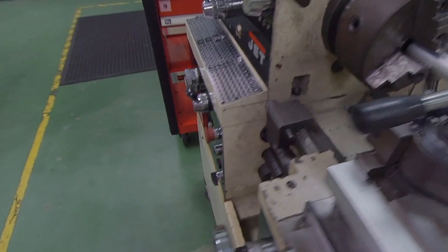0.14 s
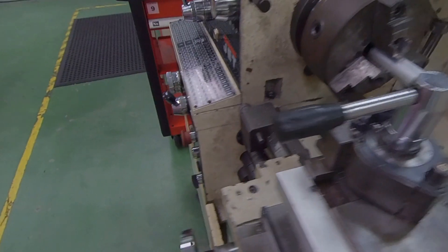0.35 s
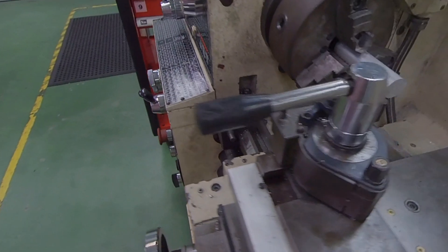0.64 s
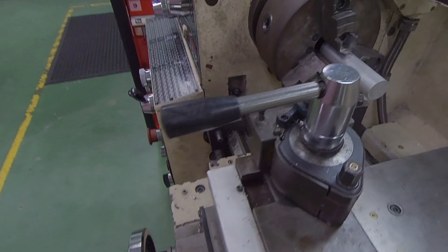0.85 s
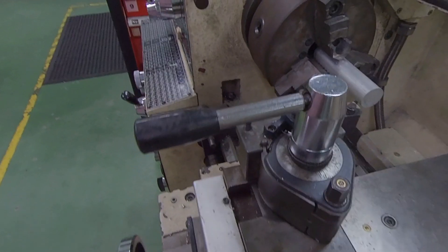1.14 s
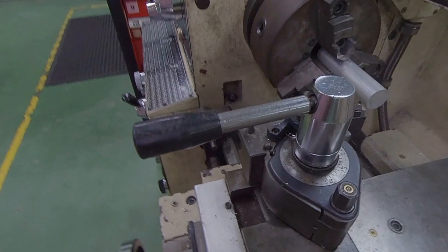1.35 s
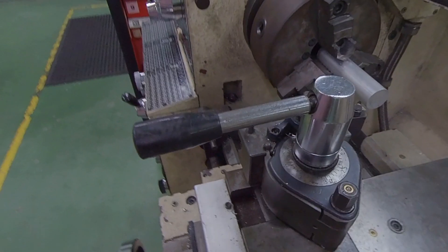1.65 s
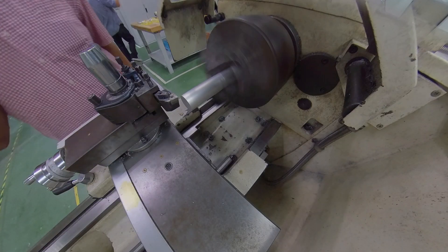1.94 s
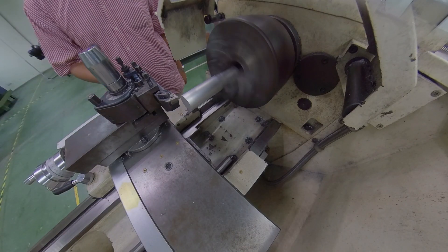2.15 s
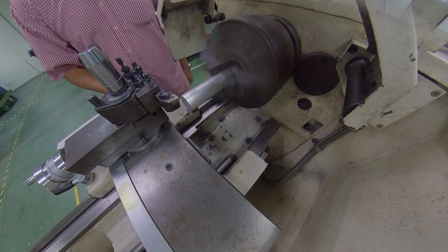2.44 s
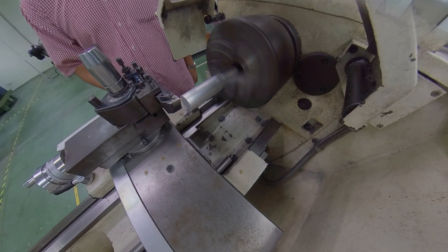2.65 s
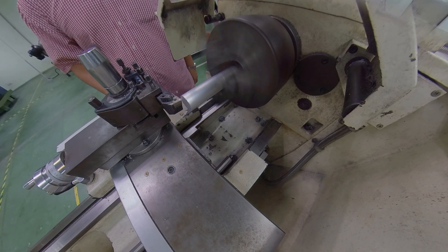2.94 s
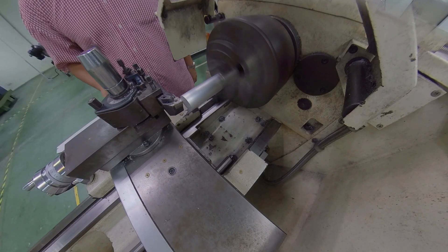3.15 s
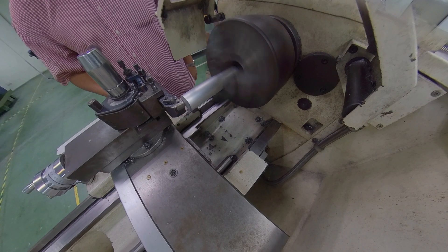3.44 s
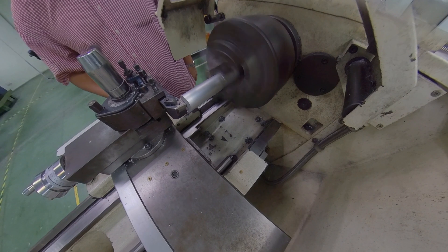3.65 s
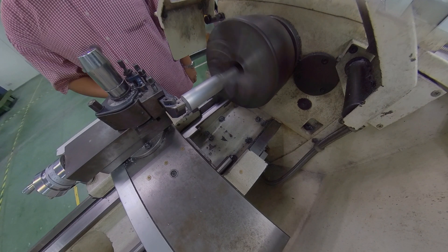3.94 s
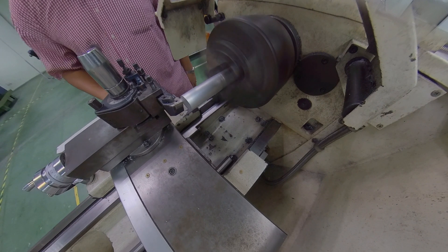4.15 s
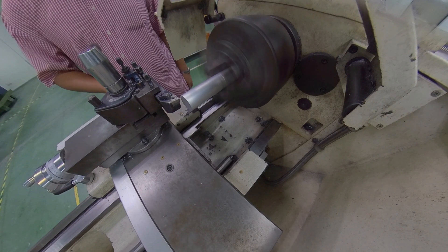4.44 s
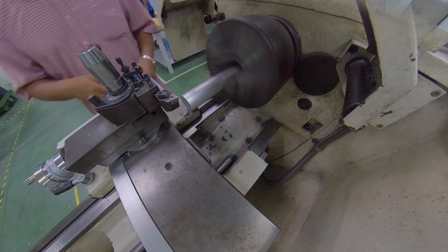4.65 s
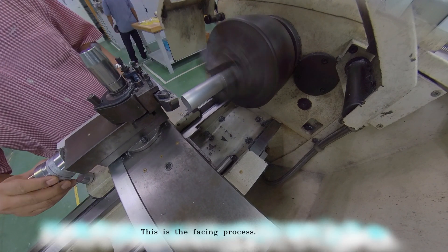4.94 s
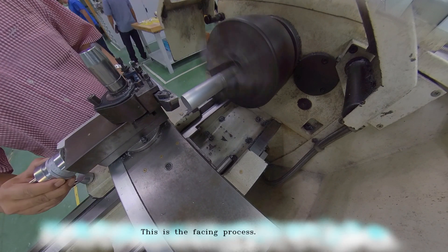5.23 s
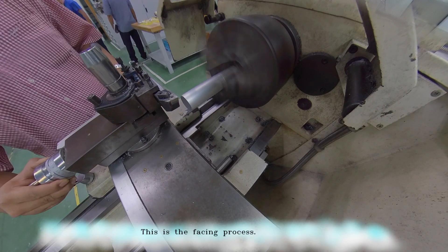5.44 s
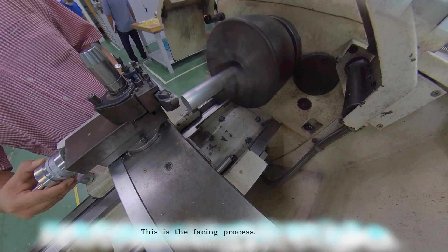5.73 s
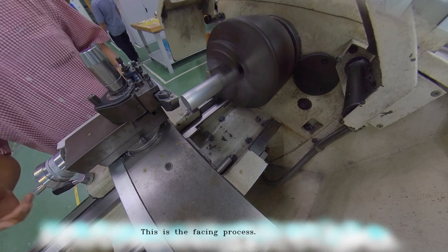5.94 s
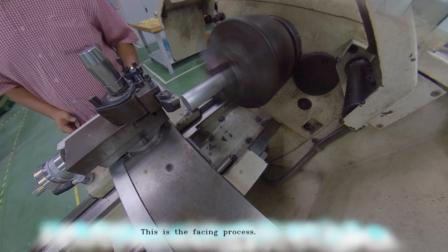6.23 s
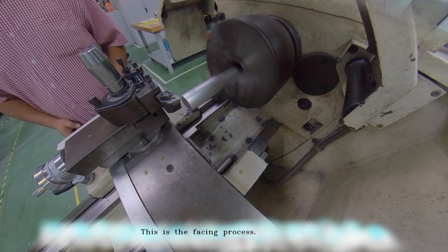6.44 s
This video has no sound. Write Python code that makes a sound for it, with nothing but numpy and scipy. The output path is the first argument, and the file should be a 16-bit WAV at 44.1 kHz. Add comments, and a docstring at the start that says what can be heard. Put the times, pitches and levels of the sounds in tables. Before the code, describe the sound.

From 0 to about 1.2 s a quiet workshop is heard: low rumble, soft distant hiss and faint airy whistles, the whistling lifting slightly near 0.95 s. A soft bump comes at 1.07 s and the background fades away. A small plastic button clicks at 1.52 s, then twice more, fainter, at 1.71 and 1.75 s. At 1.78 s a hard metallic rattling knock brings in a lathe, abruptly loud and close, surging briefly before settling. Dense bright cutting hiss rings through the frame until the end, about 6.6 s, over a slowly beating mid-low gear hum leaning right, and a thin high whine. Swarf tinkles in clumps. Short squeaks chirp around 2.0, 2.2, 2.4, 4.5 and 4.7-4.9 s. Low one-sided thumps hit near 1.9, 2.3, 3.4, 4.0, 5.3 and 6.0 s. Hum dips briefly at 3.27, 5.5 and 6.24 s; the loudest peaks overload.

```python
"""Button clicks, then a metal lathe

A quiet workshop (shaped noise) hisses and fades; a small plastic button clicks three times (struck modes).
With a rattling knock a lathe sets in close by: friction noise hisses through the ringing frame, gear tones
hum and beat, swarf flicks ring about, a thin whine and short gliding squeaks ride on top. Brief
low-frequency bumps (smooth pulses), the strongest mostly one-sided, are heard on and off a 41.7 ms grid.
The loudest peaks overload the microphone."""
import sys
import numpy as np
from scipy import signal
from scipy.fft import rfft, irfft
from scipy.io import wavfile

SR = 44100
rng = np.random.default_rng(int(sys.argv[2]) if len(sys.argv) > 2 else 0)


def volts_from_db(level):
    """Convert decibel levels to linear amplitude ratios."""
    exponent = np.asarray(level, float) / 20
    return 10 ** exponent


def dump(signal):
    """Clip the signal to [-1, 1] and save it as 16-bit WAV at the path in sys.argv[1]."""
    limited = np.clip(np.atleast_2d(signal).T, -1, 1)
    pcm = np.round(limited * 32767).astype(np.int16)
    wavfile.write(sys.argv[1], SR, pcm)


N = 290619
SHAFT_HZ = 20.73   # shaft turns

# button clicks: t/s, strike level/dB, shop level dip just after/dB
CLICKS = [(1.5162, -18, -17), (1.7088, -29, -17), (1.7502, -29, -1)]


def rms_one(x):
    """Scale to unit rms."""
    return x / np.sqrt(np.mean(x ** 2) + 1e-20)


def at_hz(points, hz):
    """Read a curve on a log-frequency axis."""
    f_hz, value = np.array(points).T
    return np.interp(np.log(hz), np.log(f_hz), value)


def drift(rate_hz):
    """Slow zero-mean random signal of unit rms: low-passed noise drawn at SR / 40."""
    r = np.exp(-80 * np.pi * rate_hz / SR)
    noise = rng.standard_normal(N // 40 + 4002)
    slow = signal.lfilter([1], [1, -2 * r, r * r], noise)[4000:]   # settled part
    return np.interp(np.arange(N) / 40, np.arange(len(slow)), rms_one(slow - slow.mean()))


def ramp(start_s, length_s):
    """0 before start_s, linear to 1 at start_s + length_s."""
    return np.clip((np.arange(N) / SR - start_s) / length_s, 0, 1)


def swell(start_s, rise_s, decay_s):
    """Linear rise to 1 from start_s, then exponential decay."""
    since_top_s = np.maximum(np.arange(N) / SR - start_s - rise_s, 0)
    return ramp(start_s, rise_s) * np.exp(-since_top_s / decay_s)


def resonate(x, hz, width_hz):
    """Two-pole resonance, unit gain at its top."""
    r = np.exp(-np.pi * width_hz / SR)
    zeros = np.array([1, 0, -1]) * (1 - r * r) / 2
    poles = [1, -2 * r * np.cos(2 * np.pi * hz / SR), r * r]
    return signal.lfilter(zeros, poles, x)


def strike(clicks, modes):
    """Clicks set every mode (f/Hz, level/dB, t60/s) ringing as a decaying sine."""
    out = 0
    for hz, level_db, t60_s in modes:
        r, w = volts_from_db(-60 / (t60_s * SR)), 2 * np.pi * hz / SR
        ring = signal.lfilter([0, np.sin(w)], [1, -2 * r * np.cos(w), r * r], clicks + 1e-18)
        out = out + volts_from_db(level_db) * ring
    return out


def spread(pair, hz, likeness, balance):
    """Mid and side noise to left and right, with the correlation and balance given at hz."""
    alike, lean_db = np.clip(at_hz(likeness, hz), -1, 1), at_hz(balance, hz)
    mid, side = np.sqrt(1 + alike) * pair[0], np.sqrt(1 - alike) * pair[1]
    return (mid + side * [[1], [-1]]) * volts_from_db([[lean_db / 2], [-lean_db / 2]])


def banded(white, spectrum, likeness, balance, patchy_db):
    """Third-octave noise bands, each with its own level and flicker; neighbours use unrelated noise."""
    out, edges_hz = 0, 28 * 2 ** np.arange(0, 9.4, 1 / 3)
    for k, (low, high) in enumerate(zip(edges_hz, edges_hz[1:])):
        hz = np.sqrt(low * high)
        if spectrum[0][0] / 2 < hz < spectrum[-1][0] * 2:
            band = signal.butter(2, [low, high], "band", fs=SR, output="sos")
            pair = signal.sosfilt(band, white[k % 2])
            level_db = at_hz(spectrum, hz) + patchy_db * drift(11.4)
            out = out + volts_from_db(level_db) * spread(pair, hz, likeness, balance)
    return out


def shop():
    """Far machines and air as shaped noise: rumble, hiss, thin treble, whistles (resonances), a soft bump."""
    # relative noise density: f/Hz, density/dB
    rumble_spectrum = [(18, -38), (30, -6), (119, -4.5), (247, -4), (372, -10), (400, -11), (900, -12.5),
                       (1170, -53), (1980, -120)]
    hiss_spectrum = [(400, 6), (567, 4.5), (1040, 2.5), (1400, 3), (2170, -1.5), (2540, 0.5), (3600, -2.5)]
    treble_spectrum = [(4200, -6), (5230, -3), (5860, -0.5), (7000, -9), (8540, -8), (10300, -8),
                       (13500, -5), (15500, -7.5)]
    # stereo image: f/Hz, left-right correlation/1
    likeness = [(60, 1), (150, 0.96), (380, 0.83), (950, 0.34), (2380, 0.01), (5980, 0.16), (15000, 0.85)]
    # stereo image: f/Hz, left over right/dB
    balance = [(60, -4), (150, -1.5), (380, -2.5), (950, -0.5), (2380, -17), (5980, -11), (15000, 0.0)]
    # whistles: f/Hz, width/Hz, level/dB
    whistles = [(4810, 76, -4), (6450, 170, -11), (7350, 90, -6), (9500, 250, -2)]
    # far puffs of air: t/s, hiss lift/dB, treble lift/dB, whistle lift/dB
    puffs = [(0.0, 1, 4, 5), (0.62, 2, 2.5, 3), (0.95, -1, 4, 18)]
    hiss_edge_hz = 3460
    fade_start_s, fade_db_per_s, dip_recovery_s = 1.16, 23.5, 0.053
    white, t = rng.standard_normal((2, 2, N)), np.arange(N) / SR

    rumble = rms_one(banded(white, rumble_spectrum, likeness, balance, patchy_db=1.5))

    hiss = banded(white[::-1], hiss_spectrum, likeness, balance, patchy_db=1.0)
    hiss = hiss + volts_from_db(3) * resonate(hiss, 3460, 120)   # resonance at the steep edge
    hiss = rms_one(signal.sosfilt(signal.butter(8, hiss_edge_hz, fs=SR, output="sos"), hiss))

    treble = banded(white, treble_spectrum, likeness, [(100, 0)], patchy_db=3.0)
    above_edge = signal.butter(4, hiss_edge_hz, "high", fs=SR, output="sos")
    treble = rms_one(signal.sosfilt(above_edge, treble))

    air, whistle = rng.standard_normal(N), 0
    for hz, width_hz, level_db in whistles:
        tone = resonate(resonate(air, hz, width_hz), hz, width_hz)
        whistle = whistle + volts_from_db(level_db + 2.5 * drift(2.7)) * tone

    bump = volts_from_db(-40) * swell(1.07, 0.011, 0.025) * rms_one(0.32 * rumble + hiss)

    lifts_db = sum(np.outer(lift_db, swell(s, 0.02, 0.3)) for s, *lift_db in puffs)
    hiss_lift_db, treble_lift_db, whistle_lift_db = lifts_db
    out = volts_from_db(-46 - 4.5 * ramp(0.91, 0.1)) * rumble   # the rumble sinks first
    out = out + volts_from_db(-42.5 + hiss_lift_db) * hiss
    out = out + volts_from_db(-53.5 + treble_lift_db) * treble
    out = out + volts_from_db(-69.5 + whistle_lift_db) * rms_one(whistle) + bump

    dip_db = sum(depth_db * (t > s) * np.exp(-np.abs(t - s) / dip_recovery_s) for s, _, depth_db in CLICKS)
    return out * volts_from_db(dip_db - fade_db_per_s * np.maximum(t - fade_start_s, 0))


def button():
    """Each click is a few tiny contacts of alternate sign that strike the housing's modes."""
    # contacts within a click: delay/s, level/dB
    touches = [(0, -2), (.0004, 0), (.0007, 0), (.0012, -5)]
    # housing: f/Hz, level/dB, t60/s
    housing = [(670, 2, 0.013), (930, -14, 0.011), (2100, -4, 0.011), (2200, 0, 0.0091), (3430, -7, 0.0073),
               (5100, -12, .003), (6400, -8, 0.0027), (8750, -19, 0.0018), (10600, -25, 0.0018),
               (14000, -30, .002)]
    contacts = np.zeros(N)
    for s, strike_db, _ in CLICKS:
        for k, (delay_s, touch_db) in enumerate(touches):
            contacts[round((s + delay_s) * SR)] = (-1) ** k * volts_from_db(strike_db + touch_db)
    return strike(contacts, housing)


def friction():
    """Dense uneven contacts, throbbing with shaft and bearing rollers, direct and through the frame."""
    # direct noise, relative density: f/Hz, density/dB
    spectrum = [(30, -28.5), (200, -27.5), (306, -20.5), (529, -21.5), (723, -14), (989, -21),
                (1250, -10.5), (1700, -10.5), (2050, -13), (2340, -3.5), (3040, -4.5), (4370, -0.5),
                (7000, -2), (9200, -3.5), (12500, -7), (13800, 0), (15700, -4)]
    # resonances of tool and frame: f/Hz, width/Hz, level/dB
    frame = [(595, 25, -20), (720, 48, -14), (875, 16, -17), (932, 16, -16), (1050, 18, -10),
             (1132, 18, -5), (1168, 17, -8.5), (1244, 21, -5.5), (1270, 89, -9.5), (1667, 4.9, -6),
             (1746, 24, -13), (1895, 32, -11), (2313, 28, -4.5), (2400, 58, -5.5), (2638, 49, -2.5),
             (3270, 77, -3), (3506, 45, -2), (3940, 51, -2.5), (4190, 42, -4), (4105, 46, 2.5),
             (4370, 79, -3), (4467, 57, 3), (4660, 45, -7.5), (5030, 30, -9), (5250, 130, -3),
             (5515, 320, -3), (6005, 160, -1), (6986, 153, 5), (6630, 76, -2.5), (7260, 150, -0.5),
             (7620, 170, -2), (7880, 200, -4), (8460, 190, -3.5), (9640, 86, -3.5), (13100, 60, -15)]
    # stereo image: f/Hz, left-right correlation/1
    likeness = [(60, 0.15), (200, 0.2), (500, 0.25), (720, 0.6), (1150, 1), (1900, 0.75), (2650, 0.86),
                (3500, 0.35), (4300, 0.74), (5000, 0.42), (6000, 0.98), (7000, 0.67), (7700, 0.27),
                (9700, 0.44), (11500, .1), (15000, 0.15)]
    # stereo image: f/Hz, left over right/dB
    leaning = [(60, -4), (200, -4), (400, -9), (720, -8), (1100, 0), (3500, -1), (5000, 2), (7500, 2.5),
               (8700, -5), (11500, 1.5), (15000, -2.5)]
    roller_hz = 64.1   # roller passes
    t = np.arange(N) / SR
    throb_db = 0.16 * np.sin(2 * np.pi * SHAFT_HZ * t) + 0.88 * np.sin(2 * np.pi * roller_hz * t)
    throb_db = throb_db + 0.34 * drift(60)
    grain_db = 2.3 * rng.standard_normal(N)
    white = rng.standard_normal((4, 2, N)) * volts_from_db(throb_db + grain_db)
    out = volts_from_db(-3.5) * banded(white, spectrum, likeness, leaning, patchy_db=0.48)
    for k, (hz, width_hz, level_db) in enumerate(frame):
        ringing = resonate(resonate(white[2 + k % 2], hz, width_hz), hz, width_hz)
        waver_db = 1.16 * drift(1.5) + 0.84 * drift(40)
        out = out + volts_from_db(level_db + waver_db) * spread(ringing, hz, likeness, leaning)
    return rms_one(out)


def chips():
    """Swarf flicks tool and tray in clumps; each flick rings for 60 cycles (t60) at one of 16 pitches."""
    mean_per_s = 250 * volts_from_db(4 * drift(5))
    born = rng.random(N) < mean_per_s / SR
    sizes = volts_from_db(4.5 * np.minimum(rng.exponential(1, N), 3)) * rng.choice([-1, 1], N) * born
    pitches_hz, dealt = np.geomspace(1180, 2700, 16), rng.integers(0, 16, N)
    rings = sum(strike(sizes * (dealt == k), [(hz, 0, 60.0 / hz)]) for k, hz in enumerate(pitches_hz))
    soft = signal.sosfilt(signal.butter(2, [900, 3000], "band", fs=SR, output="sos"), rings)
    return volts_from_db(-32.5) * rms_one(soft)


def gears():
    """Two close tooth-mesh tones that beat, plus wavering side tones spaced by the shaft turn."""
    # side tones one to four shaft turns above the mesh: level/dB
    sides_db = [-53.5, -53.5, -72, -57.5]
    mesh_hz, beat_period_s, beat_top_s, left_lag_s = 352.2, 1.195, 2.525, 0.00025
    t = np.arange(N) / SR
    mesh = 2 * np.pi * np.cumsum(mesh_hz + 1.0 * drift(5.1)) / SR
    partner = volts_from_db(-2.5) * np.sin(mesh + 2 * np.pi * (t - beat_top_s) / beat_period_s)
    out = volts_from_db(-44.5 + 1.65 * drift(6.3)) * (np.sin(mesh) + partner)
    for turn, side_db in enumerate(sides_db, 1):
        phase = 2 * np.pi * np.cumsum(mesh_hz + turn * SHAFT_HZ + 1.7 * drift(7.1)) / SR
        out += volts_from_db(side_db + 4.2 * drift(7.5)) * np.sin(phase)
    left = np.roll(out, round(left_lag_s * SR))   # the hum comes from the right
    return np.sqrt(2) * np.array([left, out]) * volts_from_db([[-5], [3]])


def whine():
    """A nearly steady high tone, a side tone about one shaft turn below and the octave, sharing one waver."""
    # tones: f/Hz, level/dB
    tones = [(4359.5, -31), (4338.5, -38), (8719, -39)]
    cycles_per_hz = np.cumsum(1 + 0.00051 * drift(4.5)) / SR
    out = 0
    for hz, level_db in tones:
        out = out + np.sqrt(2) * volts_from_db(level_db + 2.8 * drift(3.2)) * np.sin(2 * np.pi * hz * cycles_per_hz)
    return out


def low_bumps():
    """Brief low-frequency pulses: strong ones, mostly one-sided; uneven ones on a grid; weak random ones."""
    # strongest bumps: t/s, left peak/dB, right peak/dB
    strongest = [(1.861, -23, -50), (1.902, -50, -24), (2.278, -25.5, -50), (2.413, -50, -28.5),
                 (3.414, -27.5, -50), (3.997, -28, -33), (5.29, -35, -24.5), (5.998, -32, -32),
                 (6.416, -45, -29)]
    grid_period_s, grid_point_s, pulse_s, random_per_s = 0.04171, 3.246, 0.0018, 30
    chosen = rng.random((2, N)) < random_per_s / SR
    heights = chosen * rng.standard_normal((2, N)) * volts_from_db(-45.5)
    grid = (np.arange(grid_point_s % grid_period_s, N / SR, grid_period_s) * SR).astype(int)
    unevenness = np.clip(rng.standard_normal((len(grid), 2)).T, -3, 2)
    heights[:, grid] = volts_from_db(-42 + 6 * unevenness)
    for s, *peaks_db in strongest:
        heights[:, round(s * SR)] = volts_from_db(peaks_db)
    pulse = np.hanning(round(pulse_s * SR))
    return signal.fftconvolve(heights, pulse[None], "same")


def knock():
    """A short rattle of hard blows from alternate sides rings a few modes as the lathe sets in."""
    # blows: t/s, level/dB
    blows = [(1.7753, -15), (1.7767, -11.5), (1.778, 4), (1.7823, -5), (1.7837, -18), (1.7858, -3.5)]
    # struck body: f/Hz, level/dB, t60/s
    body = [(110, -23, 0.037), (450, -46, 0.011), (770, -39, 0.011), (1007, -10.5, 0.019),
            (1370, -9, 0.014), (1640, -7.5, 0.0071), (2820, -10.5, 0.012)]
    hits = np.zeros((2, N))
    for k, (s, level_db) in enumerate(blows):
        sign = (-1) ** k
        hits[:, round(s * SR)] = sign * volts_from_db(level_db + np.array([5.0, -5.0]) * sign)
    return signal.sosfilt(signal.butter(2, 150, "high", fs=SR, output="sos"), strike(hits, body))


def squeaks():
    """Brief stick-slip tones of the tool edge: quick start, ragged fade, gliding unsteady pitch."""
    # squeaks: t/s, length/s, start f/Hz, end f/Hz, start level/dB
    slips = [(1.981, 0.043, 1270, 1300, -21), (2.002, .045, 1880, 2400, -20),
             (2.233, 0.032, 1990, 2000, -22), (2.396, 0.05, 2350, 2300, -16),
             (4.49, 0.038, 1870, 1850, -22), (4.689, 0.11, 1935, 1900, -20),
             (4.802, 0.085, 1915, 1920, -25), (6.209, 0.042, 432, 440, -32.5)]
    out, rough, flutter = np.zeros(N), drift(30.7), volts_from_db(2.8 * drift(40))
    for s, length_s, start_hz, end_hz, level_db in slips:
        i, n = round(s * SR), round(length_s * SR)
        pitch_hz = np.linspace(start_hz, end_hz, n) * (1 + 0.007 * rough[i:i + n])
        tone = np.sin(2 * np.pi * np.cumsum(pitch_hz) / SR)
        out[i:i + n] += volts_from_db(level_db - np.linspace(0, 6.0, n)) * signal.windows.tukey(n, .45) * tone
    return out * flutter


def dips():
    """Gaussian dips in dB: friction hiss and gear hum sink briefly."""
    # dips: t/s, half width/s, hiss/dB, hum/dB
    sags = [(3.265, 0.023, -3, -14), (5.5, 0.024, 0, -9), (6.235, 0.017, -1, -18)]
    t = np.arange(N) / SR
    return sum(np.outer(depths_db, np.exp(-((t - s) / half_s) ** 2)) for s, half_s, *depths_db in sags)


def scene():
    """Shop and clicks; the lathe and the bumps set in held back, then open up; the hiss surges at first."""
    sets_in_s, full_s, opens_in_s, held_back_db = 1.774, 1.788, 0.0091, -12
    left_lag_s = 0.000027   # the lathe reaches the right first
    opening = volts_from_db(held_back_db * (1 - ramp(full_s - opens_in_s, opens_in_s)))
    share = ramp(sets_in_s, 0.00092) * opening
    hiss_dip_db, hum_dip_db = dips()
    hiss_db = -11 + 2.5 * swell(sets_in_s, full_s - sets_in_s, 0.11) + hiss_dip_db
    lathe = volts_from_db(hiss_db) * friction() + chips() + volts_from_db(hum_dip_db) * gears() + whine() + squeaks()
    delay = np.exp(-2j * np.pi * np.fft.rfftfreq(N, 1 / SR) * left_lag_s)
    lathe[0] = irfft(rfft(lathe[0]) * delay, N)
    return shop() + button() + knock() + share * lathe + share * low_bumps()


def top_cut(x):
    """Nothing passes above the cut-off."""
    return signal.sosfilt(signal.butter(12, 16190, fs=SR, output="sos"), x)


def record(dry):
    """The overloaded microphone rounds the loudest peaks off below 0.92; a steep low-pass cuts the top."""
    rounded = dry / (1 + np.abs(dry / .92) ** 6) ** (1 / 6)
    low_pass = signal.ellip(12, .5, 60, 15720, fs=SR, output="sos")
    return top_cut(signal.sosfilt(low_pass, rounded))


dry = scene()
out = record(dry)
dump(out)
```